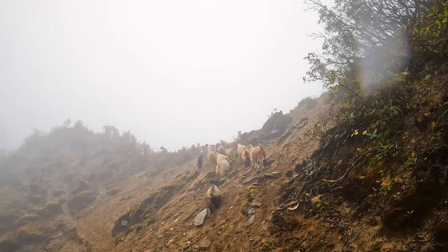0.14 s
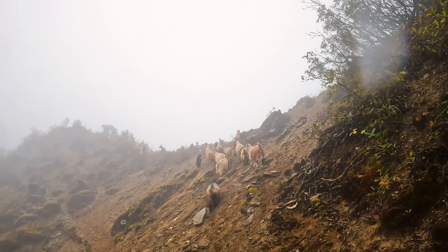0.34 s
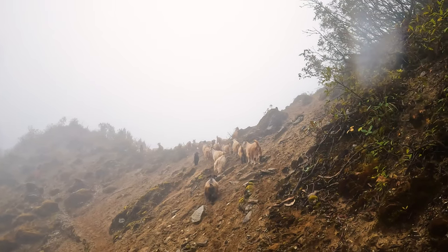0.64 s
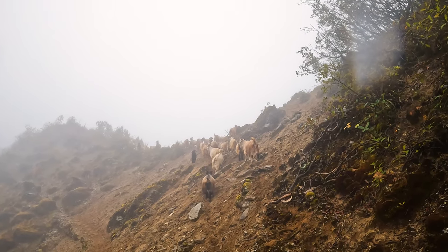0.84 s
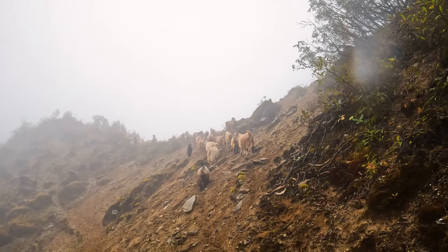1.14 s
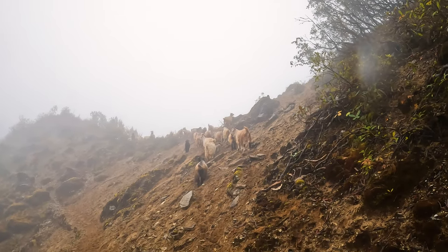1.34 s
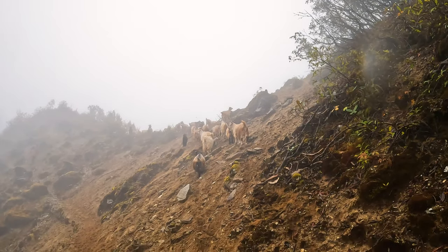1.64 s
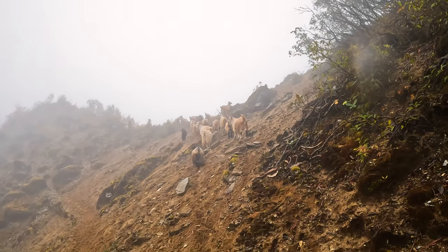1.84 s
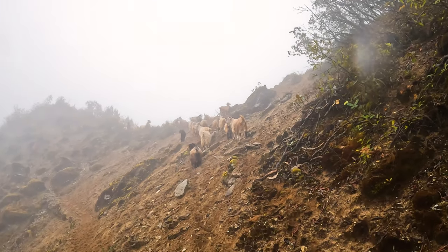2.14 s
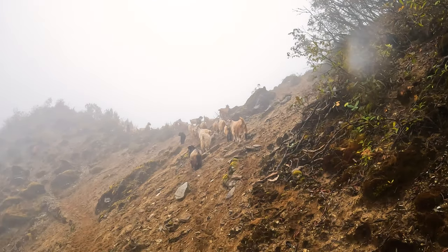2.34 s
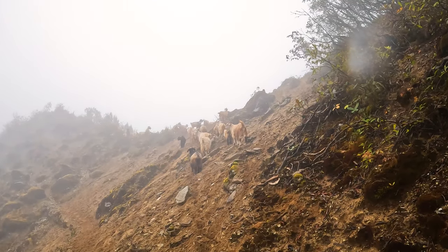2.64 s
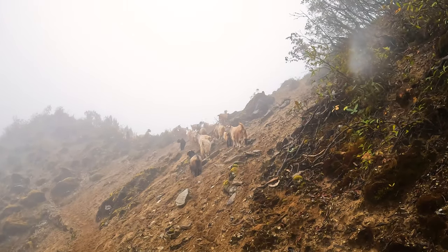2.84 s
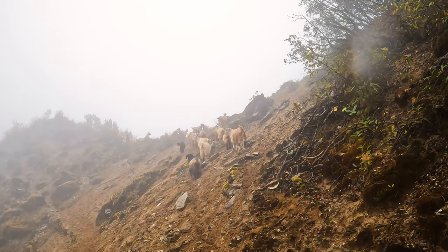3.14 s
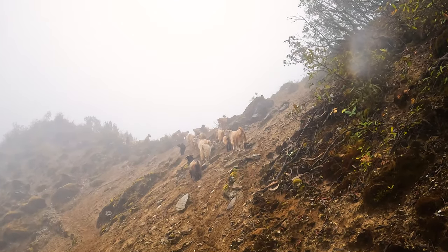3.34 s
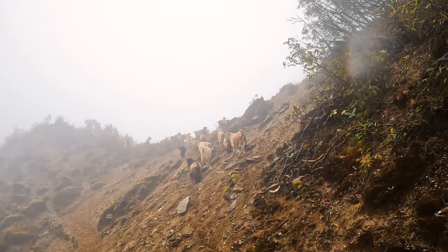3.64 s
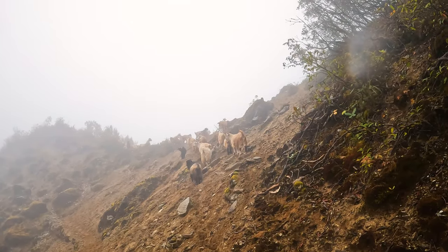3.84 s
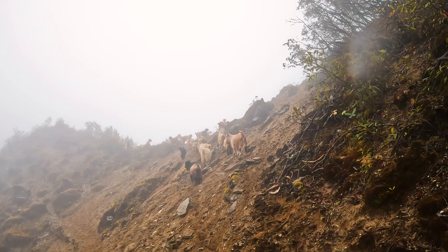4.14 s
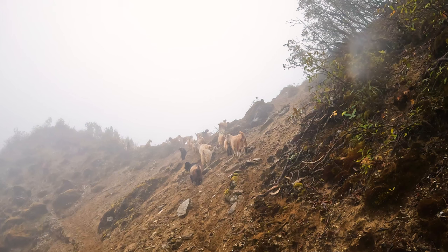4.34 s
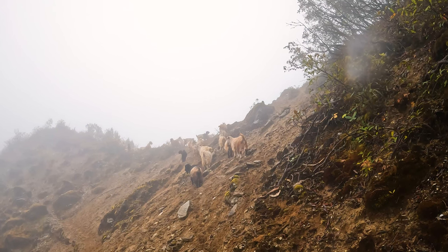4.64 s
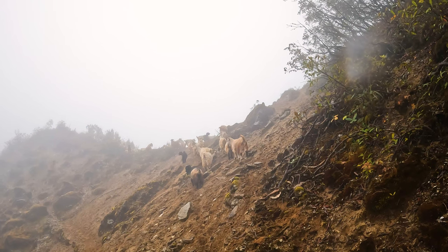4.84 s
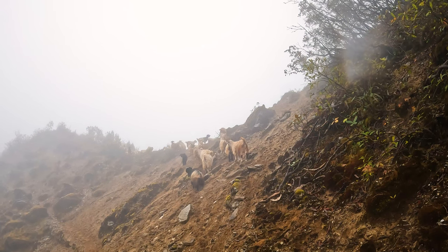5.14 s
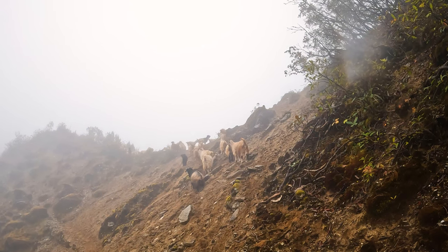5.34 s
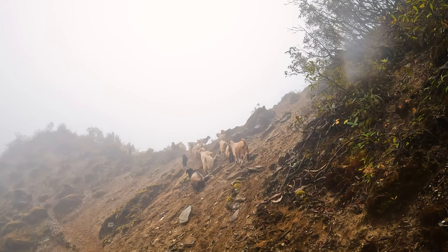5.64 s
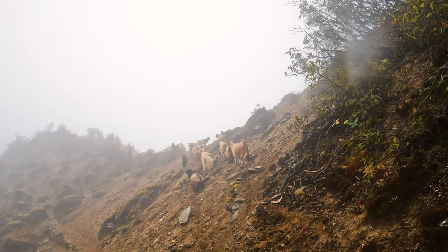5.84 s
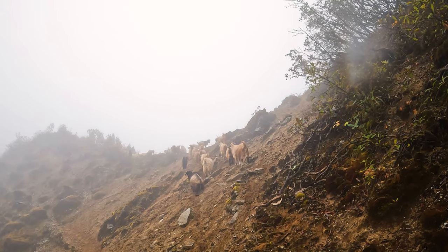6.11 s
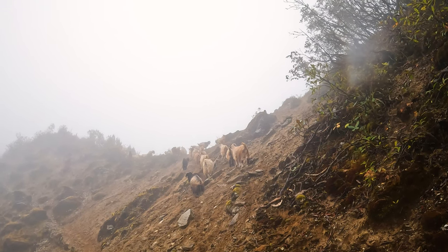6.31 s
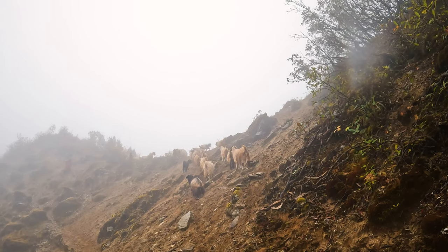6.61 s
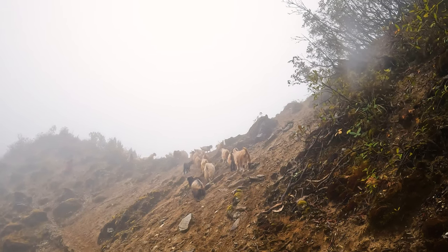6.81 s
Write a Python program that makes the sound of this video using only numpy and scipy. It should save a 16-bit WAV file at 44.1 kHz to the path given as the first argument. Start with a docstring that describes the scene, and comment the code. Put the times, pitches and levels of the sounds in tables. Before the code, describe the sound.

Outdoors on a foggy stony slope, low wind buffets a hand-held microphone over a thin steady hiss. Small stones click and gravel slides under hooves; a heavy step knocks rocks together with a dull thud while a distant goat bleats faintly. Then one nearer goat gives a short, trembling bleat, starting closed-mouthed and opening out. Two fainter herd bleats follow, with sparse pebble ticks, handling rubs and a late soft footstep.

```python
"""A goat gives one quavering bleat on a stony hillside; others of the herd bleat faintly further off.
Voices are vocal fold pulses and breath noise through throat resonances.
Stones are ringing noise bursts, gravel is sparse random grains, under moving feet; two steps thud.
The hand-held camera is rubbed (uneven noise); its bumps and the steps are noise through broad modes.
Wind, a low murmur of open air and a thin hiss are coloured noise."""
import sys
import numpy as np
from scipy import signal
from scipy.fft import rfft, irfft
from scipy.io import wavfile
from scipy.ndimage import uniform_filter1d

SR = 44100
rng = np.random.default_rng(int(sys.argv[2]) if len(sys.argv) > 2 else 0)


def wrap_up_sound(samples):
    """Save the sound to the file named by the first command line argument, as 16-bit audio."""
    columns = np.atleast_2d(samples).T
    # keep every value between -1 and 1, then stretch to whole-number steps
    tamed = np.clip(columns, -1, 1)
    steps = np.round(tamed * 32767).astype(np.int16)
    wavfile.write(sys.argv[1], SR, steps)


N = 307552
TIME, BINS = np.arange(N) / SR, np.fft.rfftfreq(N, 1 / SR)
EDGE_HZ = 13700  # top of the band


def amp(db):
    """Decibels to gain."""
    return 10 ** (np.asarray(db) / 20)


def unit(x):
    """Scales to rms 1."""
    return x / np.sqrt(np.mean(x ** 2) + 1e-20)


def read(points, hz):
    """Interpolates a (Hz, value) curve on a log-frequency axis."""
    f, value = np.transpose(points)
    return np.interp(np.log(hz + 1), np.log(f + 1), value)


def colour(x, points):
    """Filters by a (Hz, dB) spectrum."""
    return irfft(rfft(x) * amp(read(points, BINS)), N)


def pan(db):
    """Left and right gains, mean 1, for a left-right level difference."""
    gains = amp([[db / 2], [-db / 2]])
    return gains / gains.mean()


def add(mix, s, sound):
    """Adds a stereo sound at time s, cut at the end of the mix."""
    part = mix[:, round(s * SR):][:, :sound.shape[1]]
    part += sound[:, :part.shape[1]]


def waver(n, rate_hz):
    """Slow random curve of rms 1: noise under a Gaussian low-pass."""
    lowpass = np.exp(-(np.fft.rfftfreq(n, 1 / SR) / rate_hz) ** 2)
    return unit(irfft(rfft(rng.standard_normal(n)) * lowpass, n))


def pair(a, b, same):
    """Two channels with a given likeness from two unrelated signals."""
    same = np.clip(same, -1, 1)
    return np.array([a, irfft(same * rfft(a) + np.sqrt(1 - same ** 2) * rfft(b), N)])


def resonate(x, hz, width_hz):
    """One-pole resonance of gain 1 at a fixed or moving frequency, by shifting it to 0 Hz and back."""
    turn = np.exp(2j * np.pi * np.cumsum(hz * np.ones(len(x))) / SR)
    r = np.exp(-np.pi * width_hz / SR)
    return 2 * (turn * signal.lfilter([1 - r], [1, -r], x / turn + 1e-18)).real


def swells(rows):
    """Gain of overlapping events that each build up to a height and die away, 20 dB per stated time."""
    power = 0
    for s, db, rise_s, fall_s in rows:
        drop_db = 20 * np.maximum((s - TIME) / rise_s, (TIME - s) / fall_s)
        power = power + amp(db - drop_db) ** 2
    return np.sqrt(power)


# decay time of the scatter off the hillside: (frequency [Hz], T60 [s])
SLOPE_T60 = [(200, 0.57), (1500, 0.25), (4000, 0.33), (9000, 0.029)]


def hillside(x):
    """Rocks and bushes scatter a thin, short tail: sparse random taps, decaying per band."""
    taps = rng.standard_normal((2, SR // 2)) * (rng.random((2, SR // 2)) < 2500 / SR)
    hz, t, z = signal.stft(taps, SR, nperseg=256)
    decay = amp(-60 * t / read(SLOPE_T60, hz)[:, None])
    tail = signal.istft(z * decay, SR, nperseg=256)[1]
    return signal.fftconvolve(x, tail / np.linalg.norm(tail[0]), axes=1)[:, :N]


# wind strength, before WIND_GAIN_DB: (time [s], level [dB])
WIND = [(0.0, -59), (0.64, -54), (1.05, -59.5), (1.32, -42.5), (1.53, -56.5), (1.68, -45), (1.9, -53),
        (2.3, -48), (2.62, -59), (2.8, -50.5), (3.2, -52.5), (3.88, -66), (4.25, -49), (4.8, -63.5),
        (5.5, -53.5), (5.75, -67.5), (6.1, -51), (6.97, -61)]
# gust spectrum on the microphone ports: (frequency [Hz], density [dB per Hz])
WIND_COLOUR = [(3, -6.5), (11, -1), (20, -7.5), (35, -16), (55, -28), (80, -45.5), (130, -86), (300, -97),
               (2000, -140)]
# open-air murmur spectrum: (frequency [Hz], density [dB per Hz])
AIR = [(47, -24), (80, -14.5), (113, -14.5), (162, -2), (226, -7), (257, -10.5), (353, -12.5), (438, -15.5),
       (627, -19.5), (939, -25), (1020, -17.5), (1690, -24.5), (2500, -41), (3250, -86), (5500, -120)]
# hiss spectrum: (frequency [Hz], density [dB per Hz])
HISS = [(1180, -52), (2000, -9), (2240, -13.5), (2350, -12), (2590, -13.5), (3010, -14.5), (3550, -16.5),
        (4130, -18), (4770, -11), (6070, -7.5), (6290, -4.5), (6970, -1.5), (8460, -15), (10000, -25),
        (12000, -29.5), (18600, -120)]
# left-right likeness of air and hiss: (frequency [Hz], likeness [0-1])
AIR_SAME = [(60, 0.8), (200, 0.64), (500, 0.37), (1000, 0.18), (2000, 0.043), (4000, 0.68), (8000, 0.62),
            (12000, 0.14)]
WIND_GAIN_DB, AIR_DB, HISS_DB = 9, -65, -68


def background():
    """Wind on the ports, the low murmur of the valley and a steady hiss, all coloured noise."""
    noise = rng.standard_normal((3, 2, N))
    wind_db = np.interp(TIME, *np.transpose(WIND)) + WIND_GAIN_DB
    air_db = AIR_DB + 2 * waver(N, 23)
    same = read(AIR_SAME, BINS)
    wind = unit(colour(pair(*noise[0], 0.87), WIND_COLOUR)) * amp(wind_db) * pan(-5.5)
    air = unit(colour(pair(*noise[1], same), AIR)) * amp(air_db) * pan(-4.5)
    hiss = unit(colour(pair(*noise[2], same), HISS)) * amp(HISS_DB) * pan(1)
    return wind + air + hiss


# finger strokes over the shell, before a 1 dB gain:
# (time of height [s], level [dB], build-up per 20 dB [s], fade per 20 dB [s])
RUB = [(.1, -61, 0.17, 0.18), (.71, -63.5, 0.12, 0.23), (1.31, -61.5, 0.16, 0.11), (1.72, -68, 0.49, 0.13),
       (1.92, -60.5, 0.49, 0.25), (5.22, -68, 0.24, 0.26), (5.89, -61.5, 0.075, 0.086),
       (6.04, -59.5, 0.033, 0.34), (6.275, -68, 0.061, 0.82), (6.96, -61, 0.12, 0.14)]
# rubbing spectrum: (frequency [Hz], density [dB per Hz])
RUB_COLOUR = [(200, -35), (450, -4), (800, -16), (1130, -6), (1360, 1.5), (1600, -9.5), (2100, -17),
              (3500, -22), (6000, -24), (12000, -76)]


def rubbing():
    """Skin drags unevenly over the shell, close to the left port: noise of wavering strength."""
    drag = rng.standard_normal((2, N)) * amp(1.13 * waver(N, 60))
    return unit(colour(pair(*drag, 0.23), RUB_COLOUR)) * swells(RUB) * amp(1) * pan(9.9)


# gravel slides under the feet, before a -0.5 dB gain:
# (time of height [s], level [dB], build-up per 20 dB [s], settling per 20 dB [s])
GRAVEL = [(.3, -63, 0.28, 0.16), (.55, -68.5, 0.14, 0.16), (.81, -59, 0.043, 0.12), (.96, -65, 0.022, .07),
          (1.08, -63.5, 0.12, 0.31), (1.25, -60, .02, 0.096), (1.81, -54, 0.26, 0.43),
          (2.09, -60, .02, 0.6), (2.82, -66.5, 0.96, 0.62), (3.058, -51.5, 0.034, 0.034),
          (5.17, -69.5, 0.21, 0.49), (5.91, -63.5, 0.087, 0.027), (6.0, -62, 0.041, 0.043)]
# grain spectrum: (frequency [Hz], density [dB per Hz])
GRIT = [(530, -24), (900, -19), (1150, -3.5), (1500, -7), (1900, -8.5), (2300, -4.5), (3200, -9),
        (4960, -8.5), (5810, -9), (7150, -11), (8460, -21.5), (11000, -24.5), (13500, -39.5), (18600, -120)]
GRAINS_PER_S = 3500


def gravel():
    """Thousands of tiny grains of random size tumble under the feet: sparse impulses, coloured."""
    size_db = 2.1 * np.minimum(rng.exponential(1, (2, N)), 5)
    sizes = amp(size_db) * rng.standard_normal((2, N))
    grains = sizes * (rng.random((2, N)) < GRAINS_PER_S / SR)
    return unit(colour(pair(*grains, 0.85), GRIT)) * swells(GRAVEL) * amp(-0.5) * pan(1.8)


# clicking stones: (time [s], nominal peak [dB], ring [Hz], left-right difference [dB])
STONES = [(0.3245, -44.5, 3580, -2), (0.454, -46, 2060, -1), (0.5508, -48.5, 4860, -2),
          (1.0958, -48.5, 7000, -2), (1.5392, -52.5, 6760, 2), (1.8057, -35.5, 3100, 2),
          (1.8144, -41, 2190, 12), (2.0608, -36, 1550, 4), (2.0695, -28.5, 1620, 2.5),
          (2.08, -33.5, 3300, 3), (2.0864, -32, 2580, 2), (2.0926, -40, 2370, 1), (2.275, -47, 1750, -2),
          (2.3393, -50, 1860, -2), (2.5554, -45, 3370, 4), (2.817, -48.5, 7560, 1), (4.1572, -51, 1930, 3),
          (4.835, -53, 6490, 3), (5.1468, -50, 6700, 3), (5.914, -43.5, 2220, 3), (6.454, -50.5, 2150, 2)]
# click spectrum without the ring: (frequency [Hz], density [dB per Hz])
STONE = [(150, -51), (400, -34), (800, -10.5), (1200, -8.5), (1600, -6.5), (2600, -8), (3400, -0.5),
         (4300, -6.5), (6200, 1.5), (7500, -3), (9000, -10.5), (11000, -19), (13000, -40)]
# decay and ring of a stone of middling level
MIDDLING_DB, STONE_T60_S, STONE_RING_DB = -45, 0.021, 5
# heavier stones ring more: ring dB per dB above middling, level step that doubles the decay time
RING_PER_DB, DOUBLING_DB = 1.7, 32
# random pebble ticks: mean rate, mid level, mid ring
PEBBLES_PER_S, PEBBLE_DB, PEBBLE_HZ = 2.5, -53, 7100


def stones():
    """Each stone or randomly timed pebble gives a short gritty noise burst with its own ring."""
    out, t = np.zeros((2, N)), np.arange(4096) / SR
    hz = np.fft.rfftfreq(len(t), 1 / SR)
    chance = rng.uniform(-1.1, 1, (round(PEBBLES_PER_S * N / SR), 4))
    pebbles = [(abs(when) * N / SR, PEBBLE_DB + 3 * size, PEBBLE_HZ * (1 + .1 * pitch), 4 * side)
               for when, size, pitch, side in chance]
    for s, db, ring_hz, side_db in STONES + pebbles:
        weight_db = db - MIDDLING_DB
        t60_s = STONE_T60_S * 2 ** (weight_db / DOUBLING_DB)
        burst = rng.standard_normal((2, len(t))) * amp(-60 * t / t60_s)
        burst = burst[0] + 0.3 * np.array([burst[1], -burst[1]])  # mid plus side
        ring_gain = amp(STONE_RING_DB + RING_PER_DB * max(weight_db, 0))
        ring = 1 + ring_gain / (1 + 7j * (hz - ring_hz) / ring_hz)
        click = irfft(rfft(np.roll(burst, shift=64, axis=1)) * amp(read(STONE, hz)) * ring)
        add(out, s, unit(click) * np.sqrt(t60_s) * amp(db - 5) * pan(side_db))
    return out


# bumps on the camera, plus the low body of the heavy step (2.075 s) and a footstep thud (6.578 s):
# (time [s], nominal peak [dB], left-right difference [dB], favoured frequency [Hz],
#  fall-off from it [dB per octave], contact T60 [s])
CONTACTS = [(1.193, -55.5, 10, 1510, 8, 0.0064), (1.452, -56.5, -3, 1660, 11, 0.0074),
            (1.705, -57, 13, 1680, 16, .012), (1.7225, -49, 16, 1610, 27, .015),
            (1.8496, -50.5, 18, 1600, 18, 0.015), (1.924, -49.5, 7, 1550, 6, 0.011),
            (2.075, -49, 2, 400, 10, 0.36), (2.798, -52, 17, 877, 25, 0.033),
            (3.716, -60.5, 13, 1400, 7, 0.0067), (5.97, -48, 18, 1700, 3, 0.0064),
            (5.979, -47.5, 19, 1700, 0.5, .012), (6.018, -48, 18.5, 1360, 4.5, 0.011),
            (6.051, -58, 16, 1340, 29, 0.03), (6.578, -45, 0.5, 430, 2, 0.11)]
# broad modes: (frequency [Hz], width [Hz], level [dB])
MODES = [(384, 223, 3.5), (1016, 94, -7.5), (1408, 250, -7), (1510, 480, -1), (2770, 350, -11)]


def bumps_and_steps():
    """Rough contacts and steps sound through broad modes; each favours some of them."""
    out, t = np.zeros((2, N)), np.arange(6000) / SR
    for s, db, side_db, spot_hz, focus_db, contact_s in CONTACTS:
        push = rng.standard_normal(len(t)) * amp(-60 * t / contact_s)
        ring = 0
        for f, width_hz, mode_db in MODES:
            mode = unit(resonate(resonate(push, f, width_hz), f, width_hz))
            ring = ring + amp(mode_db - focus_db * abs(np.log2(f / spot_hz))) * mode
        add(out, s, unit(ring) * amp(db - 17) * pan(side_db))
    return out


THUD_S = 2.083


def thud(db, hz, t60_s):
    """The ground gives a dull push under a heavy step: two decaying low sines."""
    out, t = np.zeros((2, N)), np.arange(SR // 3) / SR
    push = np.sin(2 * np.pi * hz * t) + .5 * np.sin(2 * np.pi * 1.6 * hz * t)
    push = push * amp(-60 * t / t60_s) * (1 - np.exp(-t / 0.007))
    add(out, THUD_S, amp(db) * push * pan(-2.1))
    return out


# manner: (fall from a crest [s], level drop between crests [dB], crest pitch mouth shut [Hz], open [Hz],
#          factor on the moving throat resonances at the first crest, its change [per s])
NEAR_MANNER = (.048, 15.5, 480, 680, .93, .24)
FAR_MANNER = (.053, 12.7, 400, 485, 1.14, 0.06)
MUFFLED_MANNER = (.04, 9, 600, 1300, 1, -1.75)  # near goat, lips closed
EFFORT_LAG_S = 0.0027  # loudness peaks just after the pitch
# the voice cracks just after each crest: delay, width, extra rasp
CRACK_S, CRACK_WIDTH_S, CRACK_RASP = .013, .006, .5


def bleat(quavers, manner, throat, hoarse, lead_s, tail_s, scoop, shut_share, top_hz):
    """Vocal fold pulses through the throat; pitch, effort and mouth swell together in each quaver."""
    crest_s, crest_hz, crest_db, trough_hz = np.transpose(quavers)
    fall_s, dip_db, shut_hz, open_hz, first_shift, shift_per_s = manner
    jitter, rasp = hoarse
    trough_s = crest_s + np.r_[np.minimum(fall_s, .6 * np.diff(crest_s)), tail_s]
    turns_s = np.r_[crest_s[0] - lead_s, np.c_[crest_s, trough_s].ravel()]
    t = np.arange(turns_s[0], turns_s[-1], 1 / SR)
    swing = np.interp(t, turns_s, np.arange(len(turns_s)) % 2)  # 0 in a trough, 1 on a crest
    turn = np.searchsorted(turns_s, t, "right") - 1
    falling, trough = turn % 2, (turn + 1) // 2
    # the higher the crest, the wider the mouth and the more pointed the quaver
    opening = np.clip((crest_hz - shut_hz) / (open_hz - shut_hz), .1, 1)
    pointed = 1 + 1.5 * (opening * crest_hz / NEAR_MANNER[3]) ** 4
    # pitch scoops in, climbs in a round arch, drops from a sharp crest
    arch = swing ** (np.r_[1, pointed][trough] * np.where(falling, 1, .65))
    low_hz = np.r_[.95 * crest_hz[0], trough_hz][trough]
    hz = uniform_filter1d(low_hz + arch * (crest_hz[turn // 2] - low_hz), size=300)
    hz = hz * (1 + scoop * np.exp(-(t - t[0]) / (.22 * lead_s)))
    turns_db = np.r_[crest_db[0] - 5, np.c_[crest_db, crest_db - dip_db].ravel()]
    effort_db = np.interp(t - EFFORT_LAG_S, turns_s, turns_db)
    # the mouth shuts early on the way down, and the slackening folds grow hoarse
    tension = uniform_filter1d(swing ** np.where(falling, 2.6, .9), size=300)
    mouth = np.interp(t, crest_s, opening) * (1 - shut_share * (1 - tension))
    slack = 1 - .75 * tension
    cycles = np.cumsum(hz * (1 + jitter * slack * waver(len(t), 256))) / SR
    # each harmonic wavers in strength by itself
    flutter_db = 3.2 * np.sin(2 * np.pi * (rng.uniform(6, 30, (28, 1)) * t + rng.random((28, 1))))
    folds = unit(sum(amp(flutter_db[k]) * np.cos(2 * np.pi * k * cycles) * (k * hz < EDGE_HZ)
                     for k in range(1, 28)))
    # breath noise pulsing with the folds
    puffs = unit((0.55 + np.exp(-(cycles % 1) / 0.42)) * rng.standard_normal(len(t)))
    crack = np.exp(-((t - crest_s[turn // 2] - CRACK_S) / CRACK_WIDTH_S) ** 2)
    drive = folds * (1 + 0.17 * waver(len(t), 160)) + rasp * (slack + CRACK_RASP * crack) * puffs
    shift = first_shift - 1 + shift_per_s * (t - crest_s[0])
    voice = 0
    for k, (f, width_hz, shut_db, wide_db, share) in enumerate(throat):
        gain = amp(shut_db + mouth * (wide_db - shut_db)) * (-1) ** k
        voice = voice + gain * resonate(drive, f * (1 + share * shift), width_hz)
    lowpass = signal.butter(4, min(top_hz, SR / 3), fs=SR, output="sos")
    voice = signal.sosfilt(lowpass, voice)
    # level the voice, so that effort alone sets the loudness
    voice /= np.sqrt(uniform_filter1d(voice ** 2, size=500) + 1e-12)
    gate = np.clip(np.minimum((t - t[0]) / (.5 * lead_s), (t[-1] - t) / (.5 * tail_s)), 0, 1)
    return t[0], (voice * amp(effort_db) * gate)[None].repeat(2, axis=0)


# near goat, one row a quaver: (crest [s], crest pitch [Hz], crest level [dB], pitch it sags to [Hz])
MUFFLED_START = [(2.935, 611, -58, 484), (3.04, 762, -57, 567), (3.089, 690, -53.5, 560)]  # behind closed lips
NEAR_BLEAT = [(3.119, 610, -37.3, 375), (3.219, 612, -41.3, 466), (3.315, 666, -40.5, 534),
              (3.413, 668, -39, 472), (3.508, 586, -43.3, 432), (3.603, 508, -49.7, 372)]
# herd, one list a bleat: (crest [s], crest pitch [Hz], crest level [dB])
FAR_BLEATS = [
    [(2.155, 461.4, -60), (2.260, 456, -60), (2.352, 482, -56.5), (2.460, 474.5, -56), (2.560, 472, -56.5),
     (2.654, 463, -59.5), (2.756, 437, -62.5)],
    [(3.935, 403, -72.5), (4.030, 419, -68.5), (4.123, 421, -66), (4.227, 449, -61.5), (4.336, 426, -66.5),
     (4.425, 371.4, -76)],
    [(6.277, 431.6, -70), (6.372, 446.5, -68.5), (6.476, 432, -67.5), (6.568, 463.4, -58.5),
     (6.675, 452, -60.5), (6.775, 404, -69)],
]
# far quavers sag ever deeper: (first sag [share of pitch], growth [per s], deepest [share], floor [Hz])
FAR_SAG = (.06, .35, 0.23, 358)
# throat resonances: (frequency [Hz], width [Hz], level mouth shut [dB], level open [dB],
#                     share of the moving factor [0-1])
MUFFLED_THROAT = [(680, 200, -11, -9, 0), (1250, 400, -15, -15, 0.3), (2800, 380, 0, 0, 1)]
NEAR_THROAT = [(670, 137, -11, 3, 0), (1100, 410, -16, -19, 0.7), (1700, 400, -14, -19.5, 0.82),
               (2550, 220, -9, 4, 0.16), (3820, 280, -2, 0.5, 0.89), (4420, 250, -0.3, -2, 0.35),
               (4930, 570, -9, -15, 0.4), (6000, 560, -10, -6.5, 0), (7100, 450, -11, -26, 0)]
FAR_THROAT = [(469, 53, -4, 1.5, 0.07), (1000, 1050, -23, -1, 0.089), (1800, 200, 2.5, -2, 0),
              (2395, 116, 1, -2.5, 0.013), (3100, 530, -5.5, -5.5, 0.29), (5420, 1650, -9.5, -7.5, 0)]
# hoarseness: (pitch jitter [share], rasp [share of the pulses])
NEAR_HOARSE = (.014, .2)
FAR_HOARSE = (.014, .3)
# echoes off the slope beside the goat: (delay [s], level [dB])
GROUND_ECHOES = [(.0024, -14), (.0052, -19)]
LEFT_LAG_S = 1.8e-5  # the near voice reaches the left port slightly later


def goats():
    """The near goat, whose bleat starts behind closed lips, and the herd, each with hillside scatter."""
    near, far = np.zeros((2, 2, N))
    add(near, *bleat(MUFFLED_START, MUFFLED_MANNER, MUFFLED_THROAT, NEAR_HOARSE,
                     lead_s=.04, tail_s=.015, scoop=-.12, shut_share=.6, top_hz=4000))
    add(near, *bleat(NEAR_BLEAT, NEAR_MANNER, NEAR_THROAT, NEAR_HOARSE,
                     lead_s=.03, tail_s=.103, scoop=.2, shut_share=0.8, top_hz=8300))
    first, growth, deepest, rest_hz = FAR_SAG
    for crests in FAR_BLEATS:
        quavers = []
        for s, hz, db in crests:
            sag = min(first + growth * (s - crests[0][0]), deepest)
            quavers.append((s, hz, db, max(rest_hz, hz * (1 - sag))))
        add(far, *bleat(quavers, FAR_MANNER, FAR_THROAT, FAR_HOARSE,
                        lead_s=0.044, tail_s=.08, scoop=-0.0903, shut_share=0.99, top_hz=7000))
    near = near + sum(amp(db) * np.roll(near, round(delay_s * SR), axis=1) for delay_s, db in GROUND_ECHOES)
    near[0] = irfft(rfft(near[0]) * np.exp(-2j * np.pi * BINS * LEFT_LAG_S), N)
    near_out = near * pan(.6) + amp(-18) * hillside(near)
    far_out = far * pan(1.5) + amp(-11) * hillside(far)
    return near_out + far_out


def scene():
    """Goats, stones, steps, handling and open air."""
    ground = stones() + gravel()
    ground = ground + amp(-12) * hillside(ground)
    contacts = bumps_and_steps() + thud(db=-38.5, hz=66, t60_s=0.15)
    return background() + rubbing() + ground + contacts + goats()


def record(dry):
    """The recorder's band limit: a linear-phase low-pass at EDGE_HZ."""
    lowpass = signal.firwin(511, EDGE_HZ, window=("kaiser", 9), fs=SR)
    return signal.oaconvolve(dry, lowpass[None], "same")


dry = scene()
out = record(dry)
wrap_up_sound(out)
```